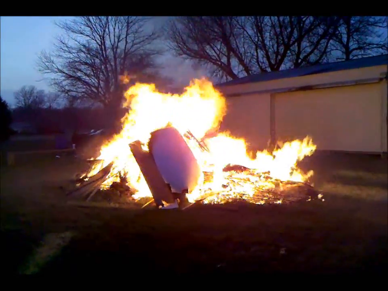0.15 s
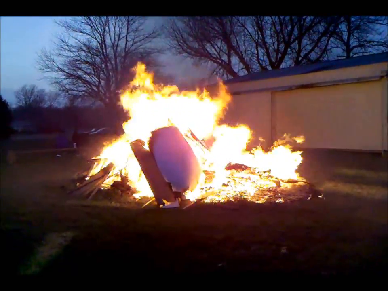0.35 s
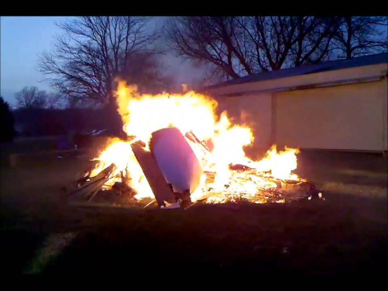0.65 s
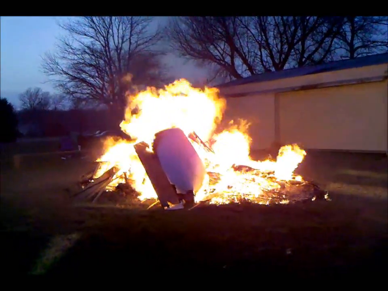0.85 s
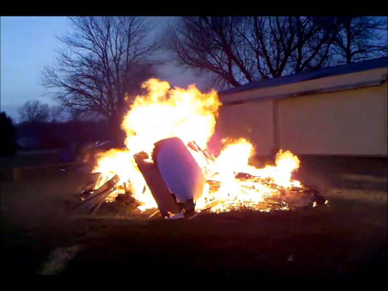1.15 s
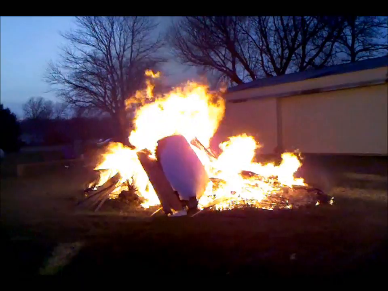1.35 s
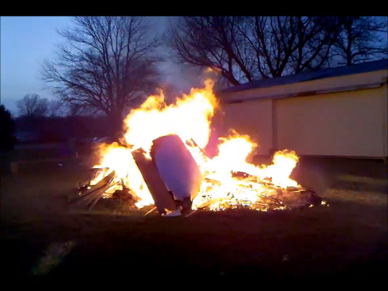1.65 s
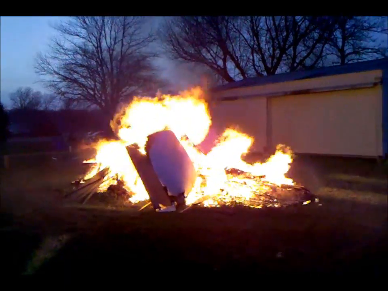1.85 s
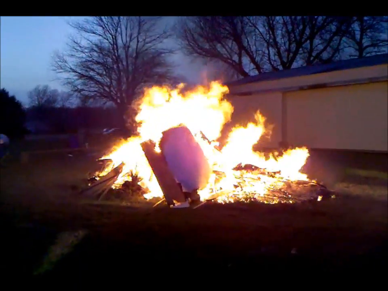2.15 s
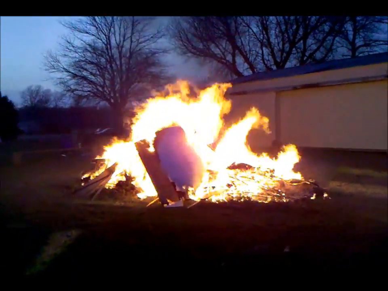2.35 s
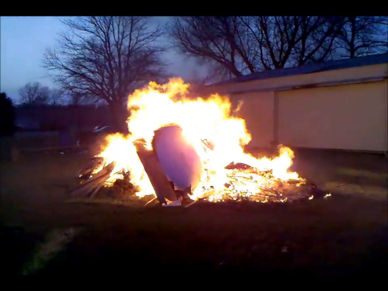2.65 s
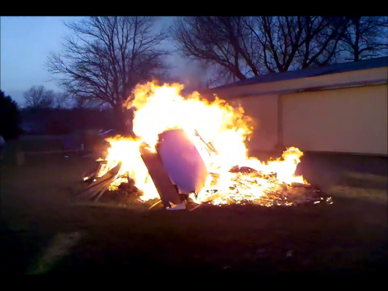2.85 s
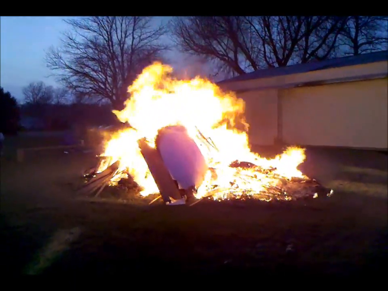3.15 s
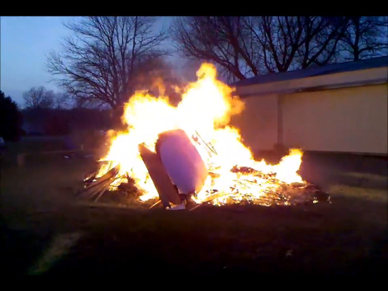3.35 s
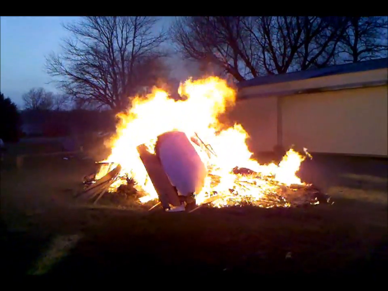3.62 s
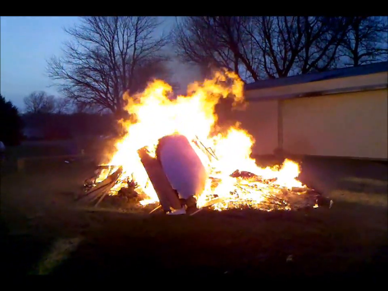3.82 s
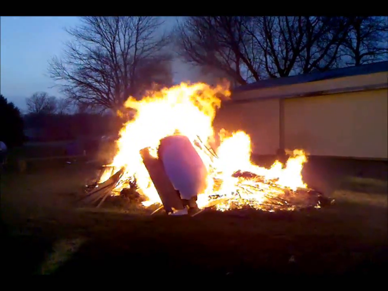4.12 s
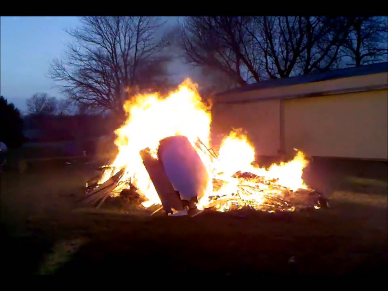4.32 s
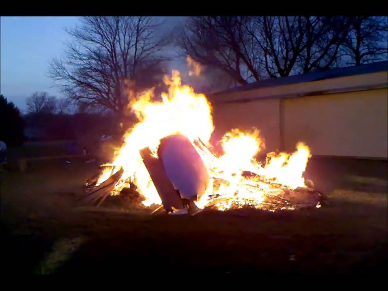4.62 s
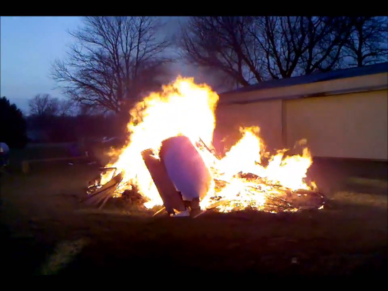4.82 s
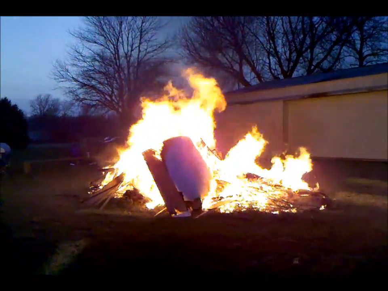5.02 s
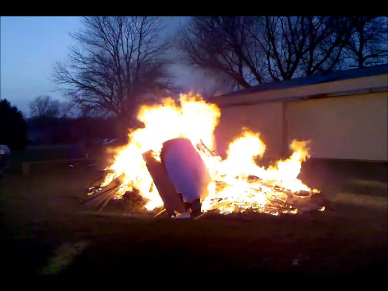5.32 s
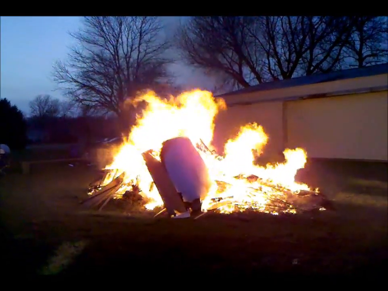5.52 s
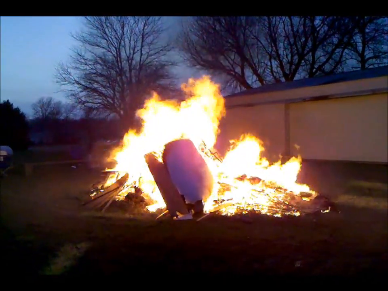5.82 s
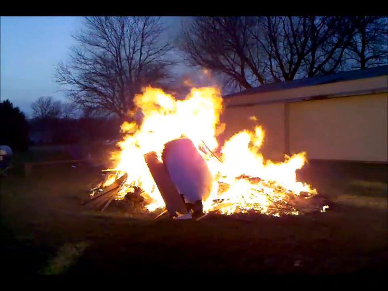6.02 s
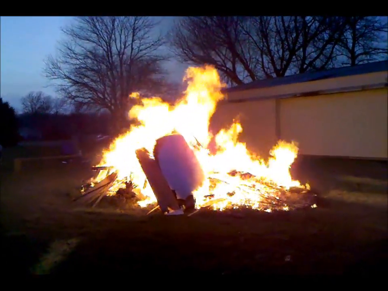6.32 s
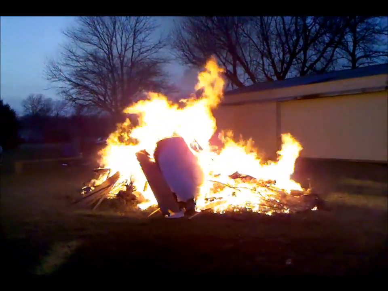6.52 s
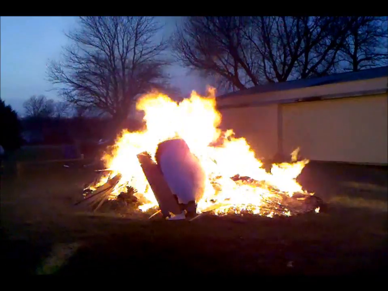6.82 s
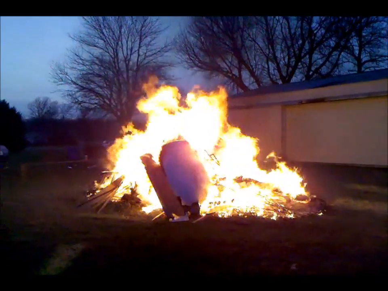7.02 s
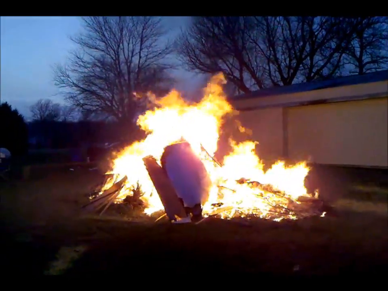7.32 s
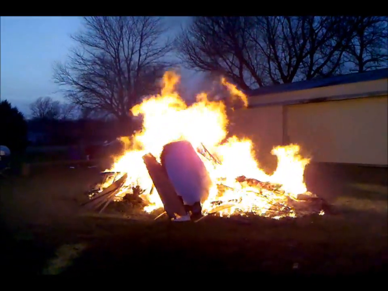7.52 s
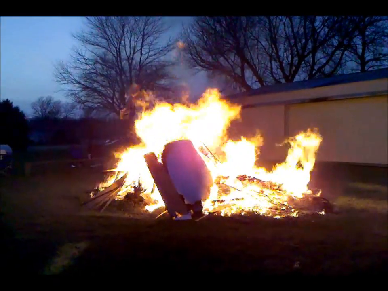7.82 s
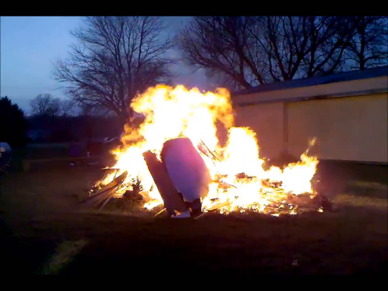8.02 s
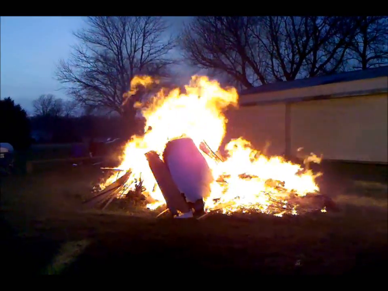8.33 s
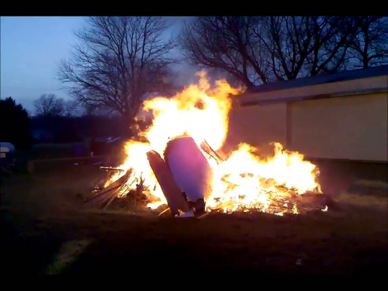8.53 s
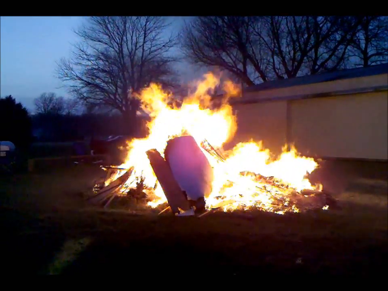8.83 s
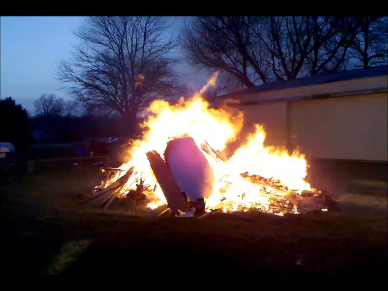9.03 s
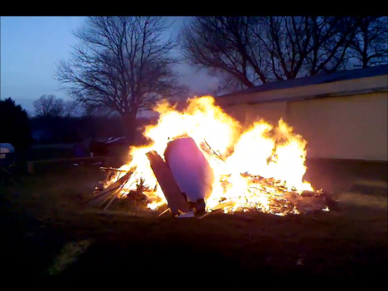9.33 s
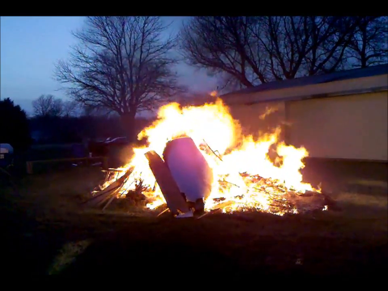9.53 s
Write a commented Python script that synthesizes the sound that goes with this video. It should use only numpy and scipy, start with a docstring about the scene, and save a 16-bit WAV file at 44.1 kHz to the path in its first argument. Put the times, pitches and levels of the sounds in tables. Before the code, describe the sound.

Outdoors near a big wood fire, continuous dense crackle and sizzling sap lie under uneven sharp cracks. The strongest snaps cluster around one second and between three and five seconds, with more near six and eight. Dry stick clacks, low settling knocks and soft gas thuds appear now and then. The sound is close, dry and treble-heavy, with limited top end, slight overload and a faint yard tail.

```python
"""Sharp snaps and longer spits crack out of a big bonfire of branches and boards on a lawn, a few metres away.
Each split is a burst of tearing fibres that rings its splinter and knocks the wood around it.
Under the splits lie clacks, dull knocks, countless tiny crackles, grainy sap hiss, and the flames' rush,
roar and soft puffs, all of shaped noise or short swelling tones. A ribbed surface nearby returns each pop
with a tiny chirp; the loudest overload a small, narrow-band microphone."""
import sys
import numpy as np
from scipy import signal
from scipy.fft import rfft, irfft, next_fast_len
from scipy.io import wavfile

SR = 44100
rng = np.random.default_rng(int(sys.argv[2]) if len(sys.argv) > 2 else 0)


def output_pcm(signal):
    """Save a mono or channel-first signal as 16-bit PCM at the path in sys.argv[1].

    Samples are clipped to [-1, 1] before scaling.
    """
    pcm = np.clip(np.atleast_2d(signal).T, -1, 1) * 32767
    wavfile.write(sys.argv[1], SR, np.round(pcm).astype(np.int16))


N = 426138
MS = SR / 1000          # samples per millisecond
LEAD_S = .004           # every tear begins this long before its main break
MIC_TOP_HZ, CUTOFF_HZ = 7250, 16200


def from_db(db):
    """Decibels to gain."""
    return 10 ** (np.asarray(db) / 20)


def rms_one(x):
    """Scale to an rms of 1."""
    return x / np.sqrt(np.mean(x ** 2) + 1e-20)


def one_ms(x):
    """Scale to the energy of one millisecond at rms 1."""
    return x * np.sqrt(MS / (np.sum(x ** 2) + 1e-20))


def in_time(rows):
    """Each column of a curve at every sample."""
    s, *columns = np.transpose(rows)
    return [np.interp(np.arange(N) / SR, s, c) for c in columns]


def band(x, low_hz, high_hz, order=2):
    """Butterworth band-pass."""
    sos = signal.butter(order, [low_hz, min(high_hz, .45 * SR)], "band", fs=SR, output="sos")
    return signal.sosfilt(sos, x + 1e-18)


def lowpass_both_ways(x, hz):
    """Gentle low-pass run forwards and backwards, so nothing shifts in time."""
    return signal.sosfiltfilt(signal.butter(1, hz, fs=SR, output="sos"), x)


def delayed(x, seconds):
    """The same sound, later."""
    return np.interp(np.arange(len(x)) - seconds * SR, np.arange(len(x)), x, left=0)


def add(out, s, sound):
    """Mix a short sound in at time s."""
    start = max(round(s * SR), 0)
    out[start:start + len(sound)] += sound[:max(N - start, 0)]


def drift(rate_hz):
    """Slow chance: noise at every 40th sample through a double one-pole low-pass; rms 1."""
    r = np.exp(-80 * np.pi * rate_hz / SR)
    noise = rng.standard_normal(N // 40 + 2002)
    slow = signal.lfilter([1], [1, -2 * r, r * r], noise)[2000:]   # drop the filter's start-up
    return np.interp(np.arange(N) / 40, np.arange(len(slow)), rms_one(slow))


def coloured(x, spectrum):
    """Give x a spectrum that falls 20 dB per octave beyond its ends; rms 1."""
    hz, db = np.transpose(spectrum)
    size = next_fast_len(N)
    octave = np.log2(np.maximum(np.fft.rfftfreq(size, 1 / SR), 1))
    outside = abs(octave - np.clip(octave, np.log2(hz[0]), np.log2(hz[-1])))
    gain = from_db(np.interp(octave, np.log2(hz), db) - 20 * outside)
    return rms_one(irfft(rfft(x, size) * gain, size)[:N])


def turbulence(spectrum, flicker_db, rate_hz):
    """Coloured noise whose level flickers; rms 1."""
    noise = coloured(rng.standard_normal(N), spectrum)
    return rms_one(noise * from_db(flicker_db * drift(rate_hz)))


def narrow(x):
    """The microphone's steep treble limit."""
    return signal.fftconvolve(x, signal.firwin(91, MIC_TOP_HZ, window=("kaiser", 5), fs=SR), "same")


def tearing(tear_ms, fibres_per_ms=10.0, spread_db=3.5, main_break=2.22, fade=0.64,
            lead=0.52, lead_share=0.54, clump_db=6.0):
    """A few fibres yield, the wood breaks, then the rest give way in uneven clumps that die away."""
    age_ms = np.arange(-round(LEAD_S * SR), SR // 12) / MS
    gives = rng.random(len(age_ms)) < fibres_per_ms / MS
    push, size = rng.standard_normal((2, len(age_ms)))
    clumps = np.interp(age_ms, np.arange(90), rng.standard_normal(90))
    clumping_db = clump_db * clumps * min(tear_ms / 2, 1)   # short tears clump less
    force = gives * push * from_db(spread_db * size + clumping_db)
    before = lead * np.exp(-abs(age_ms) / (lead_share * tear_ms))
    after = np.exp(-(abs(age_ms) / tear_ms) ** fade)
    force *= np.where(age_ms < 0, before, after)
    force[age_ms == 0] = main_break
    return force[age_ms < 3 * tear_ms + 6]


def splinter(force, hz, half_width):
    """A heavily damped piece of wood: one broad resonance, reaching the ratio half_width to either side."""
    ratio = max(half_width, 1.05)
    return band(force, hz / ratio, hz * ratio)


# Loud splits of the wood; levels are energy as rms over one millisecond, before the trims in pops:
# start_s, crack_db, body_db (woody body), pitch_hz (crack), tear_ms (at least 0.05 is played)
LOUD_SPLITS = [(0.0786, -17.5, -37.5, 6000, 20), (0.2956, -19, -36.5, 5150, 3.5),
               (0.3204, -25, -40, 5070, 0.17), (0.328, -15.5, -33, 5400, 0.11),
               (0.5224, -22.5, -37, 4570, 2.3), (0.6117, -21, -38, 5150, 1.4),
               (0.6203, -15, -33.5, 6350, 2.2), (0.6295, -17, -40, 6360, 3), (0.6737, -19, -36, 4740, 7.5),
               (0.7273, -23, -43, 5530, 3.3), (0.8756, -14.5, -35.5, 5800, 0.87),
               (0.9624, -21.5, -42, 5850, 1.3), (0.9868, -24, -48, 4800, 0.8),
               (1.0213, -6, -22, 4720, 0.39), (1.0885, -33, -40, 5500, 0.3), (1.0992, -3, -23, 4600, 0.72),
               (1.1144, -14, -39, 4740, 0.19), (1.1733, -16, -40, 4600, 0.3), (1.1794, -6, -51, 5170, 0.7),
               (1.1905, -13.5, -29, 6340, 2.4), (1.2247, -21, -30, 4900, 3.9), (1.3376, -9, -37, 5200, 0.4),
               (1.3465, -10, -37, 6260, 2), (1.3605, -19, -41, 5100, 0.4),
               (1.3993, -16.5, -15.5, 5750, 0.043), (1.4662, -26, -48, 5140, 2.3),
               (1.4822, -25, -31.5, 5000, 0.79), (1.5145, -19, -43, 5560, 4),
               (1.5342, -15, -36, 5200, 0.26), (1.547, -25, -26, 5400, 2.3), (1.556, -21, -29, 5500, 3.2),
               (1.6179, -28, -31.5, 5160, 3.7), (1.7535, -18, -28, 5470, 4.3),
               (1.836, -13.5, -31, 5700, 0.84), (1.8526, -8.5, -23, 5450, 0.69),
               (1.8638, -13, -40, 6230, 1.7), (1.9368, -22, -50, 5800, 2.7),
               (1.9996, -16, -28.5, 5370, 1.8), (2.023, -21, -38, 5400, 0.66),
               (2.118, -15, -44, 5100, 0.29), (2.1624, -16, -37, 5500, 0.51),
               (2.2341, -19, -32.5, 5470, 1.8), (2.269, -21, -43, 5300, 0.49),
               (2.2893, -20.5, -51, 6000, 0.72), (2.3108, -25.5, -54, 5130, 0.5),
               (2.3362, -17, -35.5, 5000, 0.48), (2.44, -16, -42, 5100, 1.9),
               (2.5098, -27, -36.5, 5200, 1.6), (2.5547, -7.5, -29, 5130, 0.041),
               (2.5983, -11, -53, 5320, 0.37), (2.7256, -14, -28.5, 5660, 1.7),
               (2.7467, -17, -26, 5300, 4.3), (2.7838, -6.5, -24.5, 5130, 0.056),
               (2.9321, -21, -33, 5400, 0.93), (2.9623, -22.5, -44, 5270, 3.5),
               (2.9996, -29, -46, 5070, 0.5), (3.0356, -9, -32, 5160, 0.55), (3.0814, -23, -43, 5360, 0.68),
               (3.0976, -19.5, -34, 5800, 5.7), (3.2657, -3.5, -18, 5000, 0.33),
               (3.287, -5.5, -15.5, 5250, 0.1), (3.4291, -21, -42, 6140, 0.3),
               (3.4485, -21, -32.5, 5000, 1.5), (3.4566, -18, -35, 5500, 0.17),
               (3.5607, -19, -43, 5350, 1.1), (3.5721, -13, -31, 5260, 0.13),
               (3.581, -11.5, -28, 5500, 5.4), (3.7014, -22, -48, 5500, 0.4),
               (3.7264, -21, -45, 5100, 0.57), (3.7373, 0, -19, 6250, 0.7), (3.7433, -3, -14.5, 4170, 0.62),
               (3.7519, -12.5, -47, 6100, 0.4), (3.8302, -23.5, -44, 5560, 0.65),
               (3.8475, -25, -51, 5130, 0.8), (3.8988, -9, -34, 5750, 0.12), (3.9287, -4, -19, 4940, 0.49),
               (3.9662, -25, -36, 5300, 1.1), (4.0406, -10.5, -27, 5200, 0.5),
               (4.0447, -4.5, -21.5, 4780, 0.47), (4.0776, -9.5, -27, 5330, 1.1),
               (4.0965, -16, -24, 4970, 1.7), (4.121, -9, -32, 4730, 0.32),
               (4.2011, -19.5, -31.5, 5440, 0.95), (4.2218, -14.5, -21, 5800, 3.3),
               (4.3071, -20.5, -59, 5430, 0.25), (4.4574, -8, -20, 5340, 0.07),
               (4.5304, -29, -32.5, 5460, 2.1), (4.5537, -3, -18, 5600, 0.33),
               (4.613, -14.5, -31.5, 5430, 8.2), (4.6685, -20, -44, 5440, 0.69),
               (4.7439, -24.5, -42, 5500, 1), (4.8505, -16.5, -46, 5960, 1.4),
               (4.8602, -14.5, -48, 5460, 1.4), (4.8806, -19.5, -46, 5700, 4),
               (4.892, -20, -35.5, 5400, 4.6), (4.941, -18.5, -34.5, 5040, 1.1),
               (5.0071, -30, -40, 4970, 0.4), (5.028, -19.5, -38, 5500, 2.2),
               (5.0773, -10.5, -22.5, 6100, 0.24), (5.0824, -20, -23.5, 5600, 0.25),
               (5.1397, -25, -38, 5600, 2.4), (5.262, -19.5, -32, 5600, 0.32),
               (5.268, -18.5, -46, 3000, 0.14), (5.3364, -20.5, -37, 5560, 0.8),
               (5.3465, -31, -25.5, 4770, 1.6), (5.3845, -25, -43, 5300, 0.5),
               (5.4159, -25, -39, 5650, 0.6), (5.4387, -11.5, -27, 4730, 0.99),
               (5.451, -14, -31, 5270, 2.7), (5.5385, -20.5, -30.5, 5650, 2.6),
               (5.5637, -31, -45, 4800, 0.15), (5.724, -14.5, -25, 6060, 20),
               (5.794, -10.5, -29, 5170, 1.1), (5.8585, -17, -30, 5600, 3.8), (5.9053, -18, -34, 5640, 2.7),
               (5.9366, -21.5, -44, 5540, 1.1), (5.9535, -15, -31, 5850, 7.3),
               (5.9778, -7.5, -25.5, 5600, 0.89), (5.9941, -3, -16, 5630, 0.34),
               (6.0026, -10.5, -26, 5600, 0.18), (6.033, -19.5, -38, 5600, 1.2),
               (6.0605, -25.5, -52, 4900, 0.45), (6.166, -22.5, -41, 5900, 2.3),
               (6.2045, -31, -41, 5800, 2.1), (6.2136, -23, -35, 5800, 0.8), (6.2694, -26, -38, 5370, 0.4),
               (6.2943, -23.5, -34, 5960, 2.6), (6.4701, -25, -36, 5730, 0.81),
               (6.5524, -20, -46, 5400, 0.45), (6.56, -22.5, -37, 5600, 7.9),
               (6.6254, -21.5, -24.5, 5060, 0.88), (6.732, -26, -23, 5840, 6.8),
               (6.743, -18, -44, 5530, 0.6), (6.9205, -20, -56, 6350, 2.4), (7.033, -17.5, -38, 5700, 14),
               (7.0713, -19, -43, 5740, 7.6), (7.1034, -11.5, -23, 5700, 1.3),
               (7.1285, -21, -36, 5430, 1.4), (7.1457, -17, -39, 4770, 3.9), (7.1843, -16, -36, 5340, 3.6),
               (7.1971, -22, -42, 4900, 0.58), (7.2344, -12, -32, 5470, 0.22),
               (7.2586, -21, -45, 5240, 0.24), (7.4115, -12, -23, 5540, 2.8),
               (7.5344, -19, -28.5, 5200, 1.8), (7.5499, -18.5, -32.5, 5530, 0.7),
               (7.5715, -25, -38, 5700, 0.54), (7.604, -20.5, -52, 5800, 0.73),
               (7.6138, -28, -53, 5340, 0.4), (7.6707, -19, -35, 6060, 8), (7.8461, -20.5, -37, 4940, 1.3),
               (7.9608, -20, -34, 5800, 0.56), (7.9753, -4.5, -18.5, 5040, 0.73),
               (7.9928, -21, -34, 5300, 1.4), (8.069, -11.5, -28, 4630, 0.13),
               (8.0953, -24, -31.5, 5850, 0.56), (8.101, -19, -26, 5700, 2.6),
               (8.2257, -18, -40, 5600, 0.35), (8.267, -18, -33, 5830, 11), (8.2872, -22, -39, 6000, 0.69),
               (8.3055, -27, -39, 5300, 0.89), (8.3301, -25, -38, 5700, 0.33),
               (8.3466, -19, -25.5, 5840, 0.45), (8.4132, -26.5, -31, 5300, 0.3),
               (8.4187, -16.5, -34.5, 6000, 1.1), (8.4333, -23, -46, 5700, 2.4),
               (8.4609, -28, -53, 5500, 0.2), (8.4729, -22, -40, 6200, 1.2), (8.4776, -20, -36, 5630, 0.89),
               (8.6232, -20, -35, 4900, 1.1), (8.6351, -18, -55, 5100, 0.86), (8.7565, -22, -34, 5330, 2.7),
               (8.764, -23, -38, 5270, 1.7), (8.7742, -19.5, -48, 5050, 0.63),
               (8.8663, -18.5, -36, 5050, 5.4), (8.9295, -13.5, -38, 5500, 6.3),
               (8.9493, -23, -31.5, 5660, 3.2), (8.9958, -14, -30, 5840, 3.7),
               (9.0155, -23, -41, 5400, 0.8), (9.0279, -24, -43, 5300, 0.6), (9.0459, -18, -31, 5530, 3.6),
               (9.0748, -21, -13, 5800, 0.49), (9.0806, -11, -20.5, 3880, 0.11),
               (9.1024, -27, -30, 5100, 2.3), (9.1263, -15, -33, 5900, 3.2), (9.1571, -13, -30, 5400, 0.2),
               (9.2, -18.5, -41, 5900, 0.46), (9.2371, -13.5, -49, 5040, 0.69),
               (9.33, -20.5, -43, 5340, 0.69), (9.4238, -15.5, -50, 5500, 0.23),
               (9.5469, -15.5, -40, 5200, 0.73), (9.6108, -31.5, -33.5, 4760, 0.28)]


def pops(rows, half_width_hz=1020, body_low_hz=800, body_high_hz=2900, lowest_hz=260,
         crack_trim_db=0.52, body_trim_db=1.5):
    """Each split rings its splinter briefly (the crack) and knocks the piece around it (the broad body)."""
    out = np.zeros(N)
    for start_s, crack_db, body_db, hz, tear_ms in rows:
        force = tearing(max(tear_ms, .05))
        ring = band(force, max(hz - half_width_hz, hz / 2), hz + half_width_hz)
        crack = one_ms(narrow(ring))
        knock = band(force, body_low_hz, body_high_hz, order=1)
        body = one_ms(narrow(band(knock, lowest_hz, MIC_TOP_HZ)))
        split = from_db(crack_db + crack_trim_db) * crack - from_db(body_db + body_trim_db) * body
        add(out, start_s - LEAD_S, split)
    return out


# typical lesser splits at the fire's mean vigour; levels before the trims in pops
SMALL_POPS_PER_S, SMALL_CRACK_DB, SMALL_BODY_DB, SMALL_PITCH_HZ, SMALL_TEAR_MS = 42, -32, -50, 5600, 1


def small_pops(hiss_db, crack_spread_db=1.0, body_spread_db=3.5, pitch_spread=0.22, tear_spread=0.73,
               follows=1.0, count=500):
    """Chance rows of lesser splits, dry ticks to long spits; they grow stronger as the fire burns harder."""
    moment, chance = rng.random((count, 2)).T
    crack, body, pitch, tear = np.clip(rng.standard_normal((count, 4)), -1.8, 1.8).T
    start_s = (np.arange(count) + moment) / count * N / SR   # one candidate in each equal slot
    vigour_db = follows * (hiss_db - hiss_db.mean())[(start_s * SR).astype(int)]
    rows = np.transpose([
        start_s,
        SMALL_CRACK_DB + vigour_db + crack_spread_db * crack,
        SMALL_BODY_DB + vigour_db + body_spread_db * body,
        SMALL_PITCH_HZ * np.exp(pitch_spread * pitch),
        SMALL_TEAR_MS * np.exp(tear_spread * tear)])
    return rows[chance < SMALL_POPS_PER_S * N / SR / count]


# Dry sticks that ring on briefly after they split:
# start_s, level_db (energy as rms over one millisecond), pitch_hz
RINGING_STICKS = [(1.0213, -19, 2350), (2.7467, -23, 2600), (3.0356, -15, 4570), (3.7424, -18, 2130),
                  (5.0824, -13, 3080), (5.268, -27, 2440), (9.0742, -16.5, 1400), (9.0806, -23, 2800)]


def clacks(half_width=1.11, ring_ms=1.4):
    """A stiff dry stick chatters on its own rough note for a few milliseconds."""
    out = np.zeros(N)
    for start_s, level_db, hz in RINGING_STICKS:
        clack = one_ms(splinter(tearing(ring_ms), hz, half_width))
        add(out, start_s - LEAD_S, from_db(level_db) * clack)
    return out


# Dull low knocks: burnt-through sticks settling in the pile, and the low thud under some loud splits: #
# start_s, level_db (energy as rms over one millisecond), pitch_hz
LOW_KNOCKS = [(1.399, -30, 402), (1.853, -30, 400), (2.859, -32.5, 614), (3.287, -29, 450),
              (3.742, -28, 650), (5.614, -27, 790), (5.793, -20.5, 880), (5.933, -24.5, 794),
              (5.97, -24.5, 640), (5.978, -29, 450), (5.992, -21.5, 328), (8.933, -26.5, 716),
              (9.078, -32, 330)]


def knocks(half_width=1.85, settle_ms=2.7):
    """A stick drops a little and chatters, or a loud split thuds low through the wood: a dull, low knock."""
    out = np.zeros(N)
    for start_s, level_db, hz in LOW_KNOCKS:
        knock = one_ms(splinter(tearing(settle_ms), hz, half_width))
        add(out, start_s - LEAD_S, from_db(level_db) * knock)
    return out


def crackle(hiss_db, per_s=480, spread_db=1.0, level_db=-4.0, body_db=-16.0, tear_ms=0.7, tick=4.5,
            flurry_db=4.5, tilt=8.1, half_width=1.16):
    """Twigs and bark tick in flurries, each size of splinter at its own pitch; the small, high ones lead."""
    out = np.zeros(N)
    pitches = np.geomspace(4200, 6800, num=6)
    flurry = from_db(flurry_db * drift(22))   # multiplies the basic rate per_s
    for hz in pitches:
        born = rng.random(N) < per_s / len(pitches) * flurry / SR
        sizes = from_db(spread_db * np.minimum(rng.exponential(1, N), 2.5))
        # every tick trails a short fizz of escaping steam
        fizz_power = signal.lfilter([1], [1, -np.exp(-2 / (tear_ms * MS))], born * sizes ** 2 + 1e-18)
        fizz = np.sqrt(fizz_power) * rng.standard_normal(N)
        force = tick * born * sizes + fizz
        ring = rms_one(splinter(force, hz, half_width))
        body = from_db(body_db) * rms_one(band(force, 490, 3800))
        out += (hz / pitches[0]) ** tilt * (ring + body)
    return from_db(hiss_db + level_db) * rms_one(out)


def ribs(start_s=0.0024, high_hz=7700, low_hz=4000, glide_s=0.0033, swell_s=0.0023):
    """A ribbed surface answers rib by rib at widening gaps: a falling chirp; gain 1 at its strongest pitch."""
    age = np.arange(SR // 40) / SR
    hz = low_hz + (high_hz - low_hz) * np.exp(-age / glide_s)
    swell = age * np.exp(-(age / swell_s) ** 2 / 2)
    chirp = swell * np.sin(2 * np.pi * np.cumsum(hz) / SR)
    return np.pad(chirp / abs(rfft(chirp)).max(), (round(start_s * SR), 0))


def scattered(sound, decay_s):
    """Many weak paths that die away; they shift as the hot air moves."""
    age = np.arange(SR // 4) / SR
    paths = rng.standard_normal((2, len(age))) * np.exp(-age / decay_s) * (1 - np.exp(-age * 2000))
    one, other = (signal.oaconvolve(sound, p / np.linalg.norm(p))[:N] for p in paths)
    turn = np.pi * drift(4.6)
    return np.cos(turn) * one + np.sin(turn) * other


# close echo and scatter in the pile; the echo's levels are before its treble filter
ECHO_S, ECHO_DB, RIBS_DB = .0082, -16.5, -15.5
SCATTER_S, SCATTER_DB = .0018, -10.5


def yard(x, ground=0.21, ground_s=0.00141, late_db=-17.0, late_s=0.0042, far_db=-23.0, far_s=0.04):
    """A dull ground bounce, scatter in the pile, one close chirping echo, a faint tail from trees and wall."""
    x = x + ground * delayed(lowpass_both_ways(x, 2200), ground_s)
    lag_s = ECHO_S + .00012 * drift(5)   # the echo's delay wanders a little
    chirps = from_db(RIBS_DB) * signal.oaconvolve(x, ribs())[:N]
    late = from_db(late_db) * scattered(x, late_s)
    echo = delayed(from_db(ECHO_DB) * x + chirps + late, lag_s)
    echo = band(echo, 1500, 20000, order=1)   # a small reflector returns mostly treble
    pile = from_db(SCATTER_DB) * scattered(x, SCATTER_S)
    tail = from_db(far_db) * scattered(x, far_s)
    return x + pile + echo + tail


# Relative spectrum of sap boiling out of the wood: pitch_hz, level_db (per Hz)
SAP_SPECTRUM = [(2000, -27.5), (3000, -15), (3800, 0.5), (4800, 1.5), (5700, 6), (6800, -3), (8000, -4)]


def sizzle(per_s=6000, spread_db=7.0, flicker_db=2.5):
    """Sap boils out as thousands of tiny bursts that merge into a grainy hiss; rms 1."""
    born = rng.random(N) < per_s / SR
    bursts = born * rng.choice([-1, 1], N) * from_db(spread_db * rng.standard_normal(N))
    return coloured(bursts * from_db(flicker_db * drift(36)), SAP_SPECTRUM)


# Relative spectrum of the rush of burning gas: pitch_hz, level_db (per Hz)
RUSH_SPECTRUM = [(330, -5.5), (450, -6.5), (600, 1), (780, -1), (1040, -8), (1380, -4.5), (1950, -8),
                 (3000, -11.5), (4500, -22.5)]


def flame_rush():
    """Burning gas rushes: mid-range noise with a fast flicker; rms 1."""
    return turbulence(RUSH_SPECTRUM, flicker_db=2.5, rate_hz=26)


# Relative spectrum of the low roar of the flames: pitch_hz, level_db (per Hz)
ROAR_SPECTRUM = [(30, -36.5), (60, -24.5), (85, -12.5), (120, 1), (165, 2), (230, -3), (310, -3.5),
                 (410, -16.5), (700, -21.5)]


def flame_roar(level_db=-48):
    """The flames' turbulence roars: low noise with a gentle flicker."""
    return from_db(level_db) * turbulence(ROAR_SPECTRUM, flicker_db=1.56, rate_hz=11)


# Pockets of gas catching fire with a soft thud:
# start_s, level_db (peak of the swell), pitch_hz, swell_ms (time to that peak)
GAS_POCKETS = [(0.025, -35, 151, 6.8), (0.328, -40.5, 148, 5), (1.213, -31, 153, 3.8),
               (2.409, -33, 142, 5.8), (3.287, -34.5, 85, 2.6), (5.994, -27, 90, 1.8)]


def puffs():
    """A pocket of gas ignites: a few low cycles that swell and die."""
    out, age = np.zeros(N), np.arange(SR // 10) / SR
    for start_s, level_db, hz, swell_ms in GAS_POCKETS:
        grown = age * SR / (swell_ms * MS)
        swell = grown * np.exp(1 - grown)
        add(out, start_s, from_db(level_db) * swell * np.sin(2 * np.pi * hz * age))
    return out


# How hard the fire burns, before the trims in scene: start_s, hiss_db (sap), rush_db (flames)
FIRE_VIGOUR = [(0.0, -46.5, -56), (1.24, -41.5, -50), (2.69, -45, -56), (3.69, -43.5, -53),
               (5.85, -44.5, -52.5), (6.7, -45.5, -55.5), (9.25, -42, -50.5), (9.66, -44, -52.5)]


def scene(hiss_trim_db=-1, rush_trim_db=1.5):
    """Pops, clacks, knocks and crackle in the yard, over the hiss, rush, roar and puffs of the fire."""
    hiss_db, rush_db = in_time(FIRE_VIGOUR)
    splits = pops(LOUD_SPLITS) + pops(small_pops(hiss_db))
    wood = yard(splits + clacks() + knocks() + crackle(hiss_db))
    hiss = from_db(hiss_db + hiss_trim_db) * sizzle()
    rush = from_db(rush_db + rush_trim_db) * flame_rush()
    return (wood + hiss + rush + flame_roar() + puffs())[None]


def record(dry, ceiling=0.89, splash_hz=8500, thump=0.34, thump_hz=500):
    """The microphone limits the treble; the loudest snaps overload it with a bright splash and a low thump."""
    heard = narrow(dry[0])
    excess = heard - np.clip(heard, -ceiling, ceiling)
    # only the lower part of the excess is taken away: its treble stays as the splash
    removed = lowpass_both_ways(excess, min(splash_hz, .45 * SR))
    # an overload knocks the amplifier off its bias for a moment
    bias = thump * band(np.tanh(abs(excess)), 40, thump_hz, order=1)
    held = np.clip(heard - removed - bias, -.96, .96)
    return signal.sosfilt(signal.cheby2(12, 60, CUTOFF_HZ, fs=SR, output="sos"), held)[None]


dry = scene()
out = record(dry)
output_pcm(out)
```